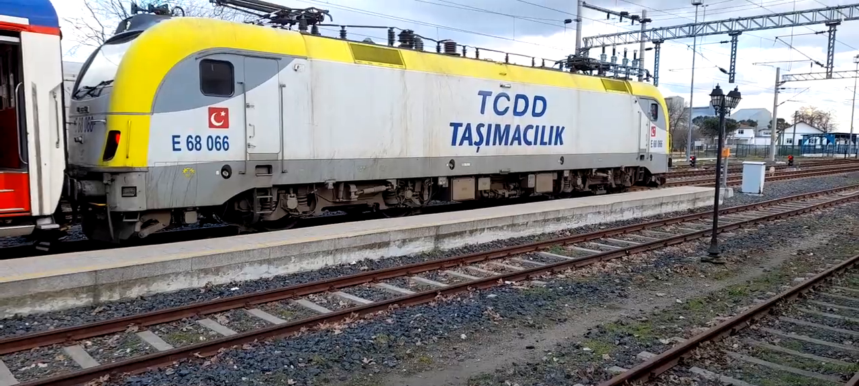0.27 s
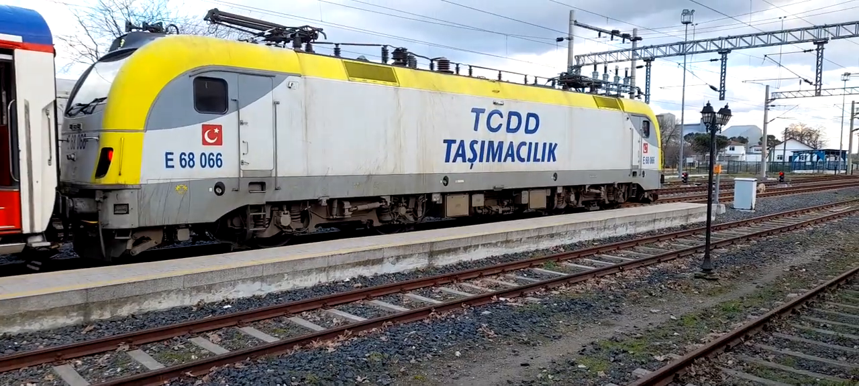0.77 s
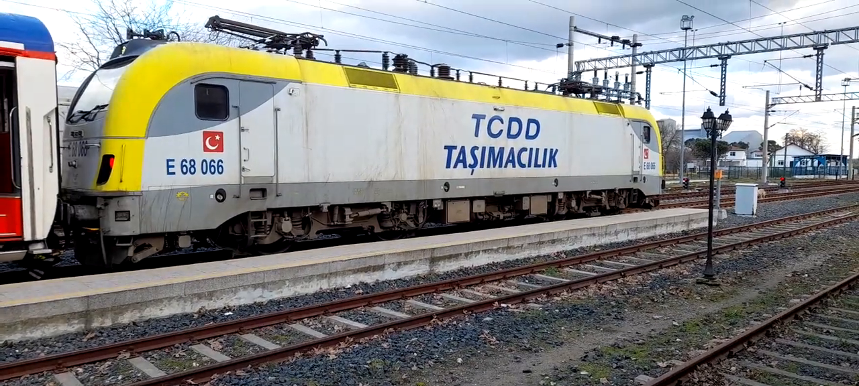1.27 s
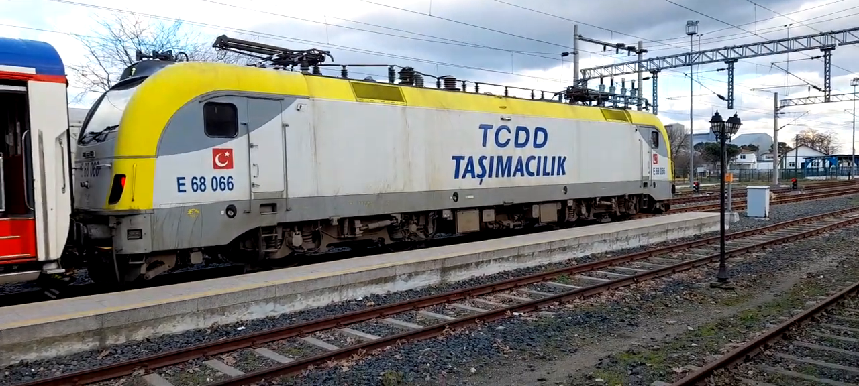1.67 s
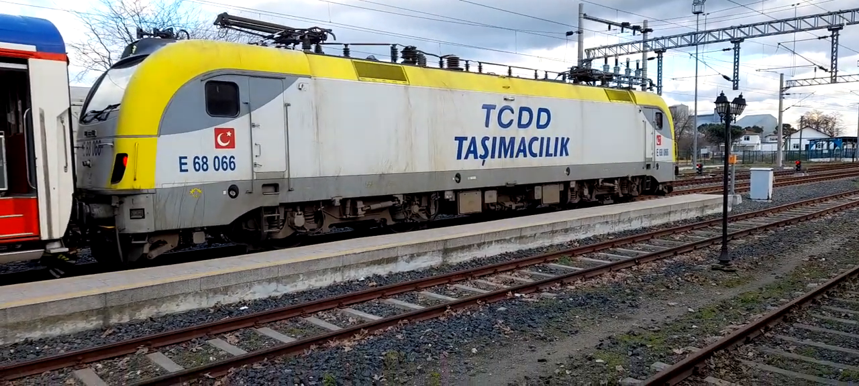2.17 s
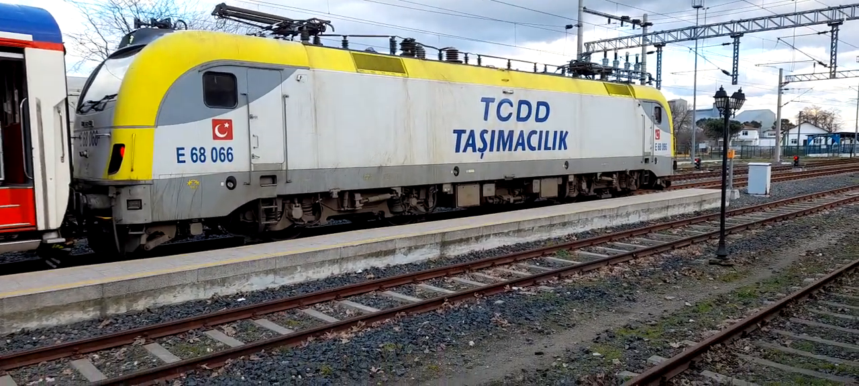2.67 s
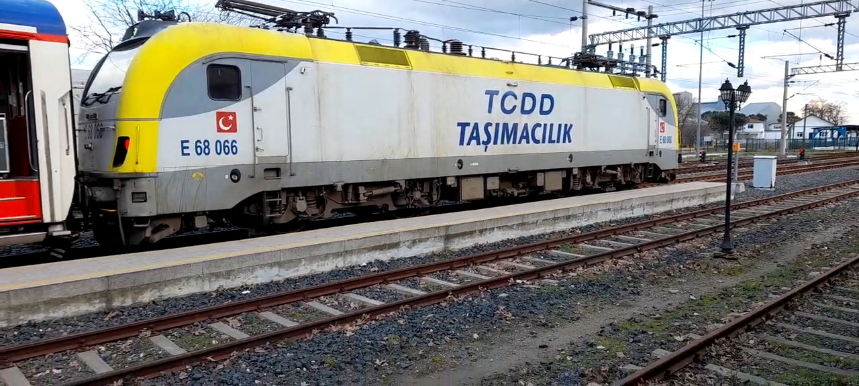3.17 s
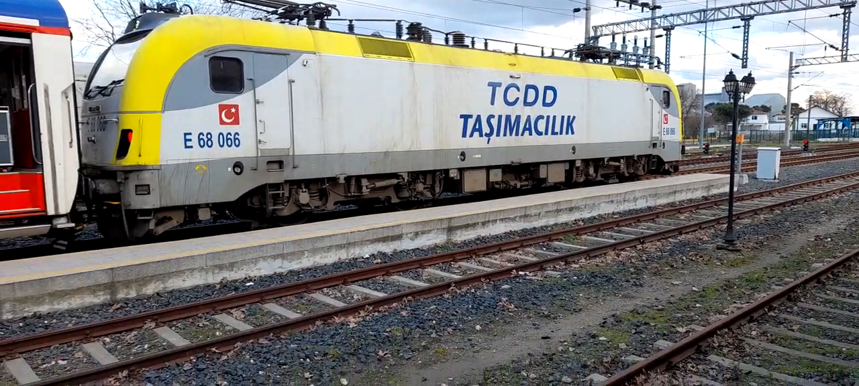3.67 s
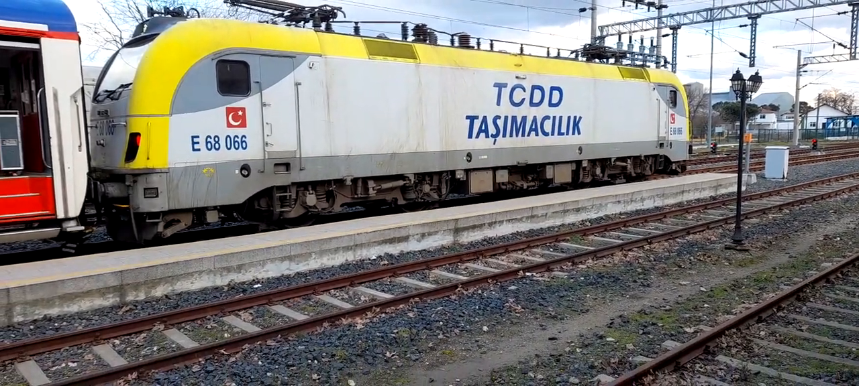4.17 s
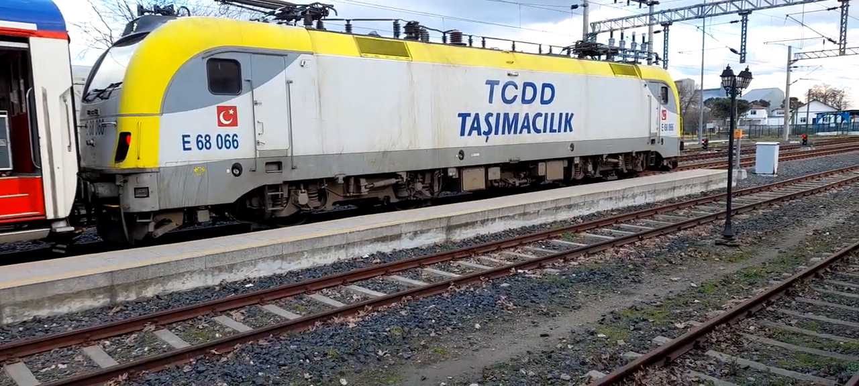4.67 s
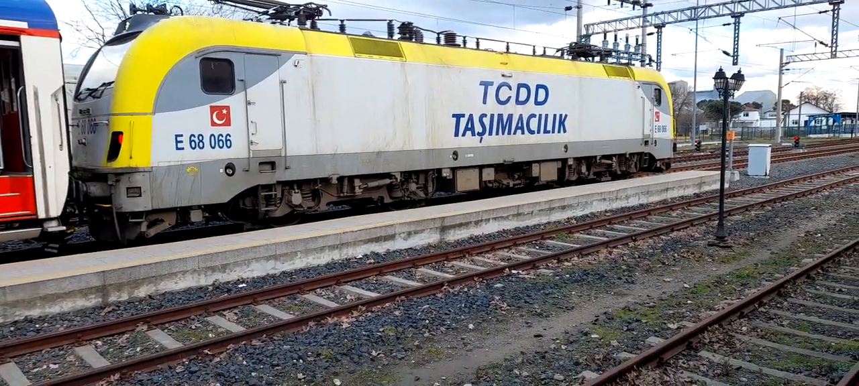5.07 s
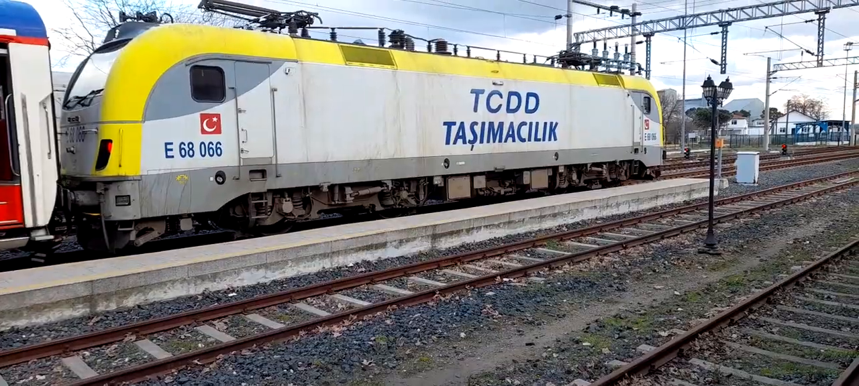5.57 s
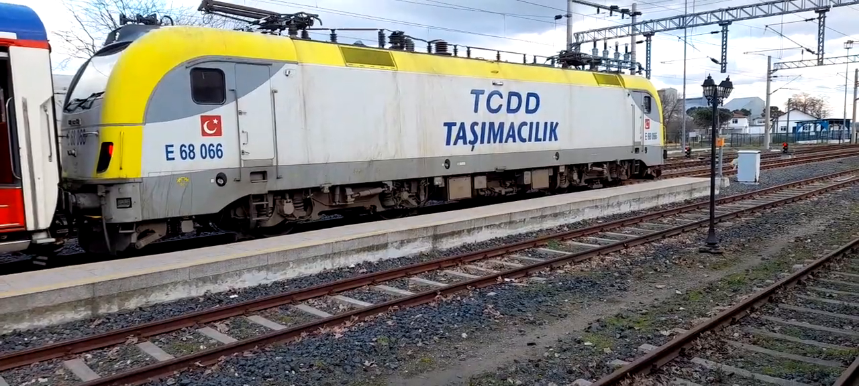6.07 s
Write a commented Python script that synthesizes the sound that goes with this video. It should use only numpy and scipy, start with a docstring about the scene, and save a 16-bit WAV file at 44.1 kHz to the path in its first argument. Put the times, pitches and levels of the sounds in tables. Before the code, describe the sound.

A locomotive vents a sudden loud hiss of compressed air for one second over a low hum, with light wind on the microphone.

```python
"""An open station yard, where an electric locomotive stands humming and jackdaws call far off.
A valve snaps open with a rising edge tone and vents compressed air for one second; the turbulent jet
stirs a hollow roar under the locomotive and reverberates between the trains. Later a thin hiss
swells, a light tap rings on metal, and a freshening wind buffets the microphone."""
import sys
import numpy as np
from scipy import signal
from scipy.fft import rfft, irfft
from scipy.io import wavfile
from scipy.ndimage import uniform_filter1d

SR = 44100
rng = np.random.default_rng(int(sys.argv[2]) if len(sys.argv) > 2 else 0)


def waveform_to_disk(signal):
    """Save audio, clipped to [-1, 1], as 16-bit WAV at the path in sys.argv[1]."""
    frames = np.transpose(np.atleast_2d(signal))
    scaled = np.clip(frames, -1, 1) * 32767
    samples = np.round(scaled).astype(np.int16)
    wavfile.write(sys.argv[1], SR, samples)


N = 278932
TIME = np.arange(N) / SR
FREQS = np.arange(N // 2 + 1) * SR / N
VALVE_OPENS_S, VALVE_SHUTS_S = 1.381, 2.4175

# Reverberation of the yard. Each row: frequency in Hz, time to decay by 60 dB in seconds.
YARD_DECAY = [(200, .9), (1000, 0.82), (3000, 0.77), (6500, 0.51), (10000, 0.37), (15000, 0.23)]
# The hum sinks after the blast and slowly returns. Each row: time in seconds, relative level in dB.
HUM_ENVELOPE = [(0, -60), (1.35, -56), (2.7, -67), (3.55, -68), (4.05, -61), (5.4, -55), (5.85, -58.5),
                (6.32, -60.5)]
# Spectrum of the hum's dull rush. Each row: frequency in Hz, relative level in dB.
HUM_SPECTRUM = [(40, -10.5), (110, 3), (200, -3), (300, 6.5), (420, 3), (700, 0), (1000, -2), (1400, -6),
                (2200, -6.5), (2600, -16.5), (3200, -23.5), (4500, -28.5), (6600, -31.5), (8000, -40)]
# Cooling fan resonances. Each row: centre in Hz, width in Hz, level in dB re the hum's envelope.
FAN_RESONANCES = [(318, 15, -3.5), (593.3, 70, -9.5), (950, 130, -10)]
# Spectrum of the faint ambient noise. Each row: frequency in Hz, relative level in dB.
AMBIENT_SPECTRUM = [(1000, -3), (2200, 4.5), (3200, -0.5), (4600, -2), (6700, 3), (8000, -12), (10500, -9),
                    (12500, -4.5), (15500, -7.5)]
# The breeze slackens, then freshens. Each row: time in seconds, strength in dB.
BREEZE_ENVELOPE = [(0, -46), (1.3, -46.5), (2.45, -47.5), (3.15, -52.5), (3.9, -41), (4.7, -39.5),
                   (5.5, -31.5), (6.32, -37.5)]
# Gusts on top of the breeze. Each row: time of the peak in seconds, length in seconds, strength in dB.
WIND_GUSTS = [(0.383, 0.13, -41), (1.117, 0.17, -39.5), (3.306, 0.043, -38), (3.832, .11, -35.5),
              (3.993, .08, -34.5), (4.482, 0.14, -35.5), (5.039, 0.098, -34.5), (5.36, .05, -30.5),
              (5.51, 0.029, -30), (5.674, 0.053, -19), (5.729, 0.025, -19.5), (5.897, 0.04, -28),
              (6.296, 0.052, -27.5)]
# Spectra of the steady flow and of gust eddies. Each row: frequency in Hz, relative level in dB.
FLOW_SPECTRUM = [(15, -27), (35, -13), (58, 2), (85, 1), (120, -1), (190, -19.5), (300, -29), (700, -50.5),
                 (1500, -73.5)]
EDDY_SPECTRUM = [(80, -12), (130, 6), (170, -3), (220, -4.5), (310, -5), (400, -21), (700, -32),
                 (2000, -64.5)]
# Jackdaw calls. Each row: start in seconds, length in seconds, first pitch in Hz, last pitch in Hz,
# relative level in dB, gain of the upper two harmonics in dB.
JACKDAW_CALLS = [(.09, .03, 926, 716, -49, -3), (.58, .028, 1255, 1110, -48.5, -12),
                 (.608, 0.037, 1273, 1160, -54.5, -10), (0.802, 0.054, 1470, 1140, -53, 2),
                 (0.841, .028, 1390, 1240, -51, -6), (.883, .047, 1430, 1080, -56, -4.5)]
# The first four harmonics of a call. Each entry: relative level in dB.
CALL_HARMONICS_DB = [-7.5, -3, -13, -21]
# Spectrum of the jet. Each row: frequency in Hz, left gain in dB, right gain in dB.
JET_SPECTRUM = [(200, -23.5, -20), (285.3, -18, -12), (440, -16, -14.5), (670, -18, -18), (950, -14, -11.5),
                (1450, -13.5, -12), (1620, -11, -4), (3000, -9, -8), (3600, -11, -9), (4262, -5, -9.5),
                (5400, -1.5, -9.5), (6740, 0.5, 2.5), (7770, -14.5, -9), (9500, -8.5, -9),
                (11500, -2, -9.5), (13000, 0, -4.5), (14200, -6, -7.5), (14900, -22, 2.5)]
# Spectrum of the thin hiss. Each row: frequency in Hz, relative level in dB.
HISS_SPECTRUM = [(1500, -5), (2200, 4.5), (2950, -1), (3600, 2), (4600, -5), (6700, 1), (7750, -9.5),
                 (9000, -4.5), (10000, -4.5), (10900, -8.5), (12100, -2.5), (12900, -2), (13450, 2),
                 (14000, -3.5), (15700, -9.5)]
# Modes of the tapped metal. Each row: frequency in Hz, relative level in dB, 60 dB decay in seconds.
METAL_MODES = [(1350, -53.5, .06), (1930, -48, .06), (2470, -56, 0.045), (4340, -47, 0.047),
               (6930, -57, 0.045)]


def undb(db):
    """Amplitude grows tenfold with every 20 dB."""
    return 10 ** (np.asarray(db) / 20)


def unit(x):
    """Normalisation to an rms of 1."""
    return x / np.sqrt(np.mean(x ** 2))


def since(s):
    """Elapsed seconds after a moment, zero before it."""
    return np.maximum(TIME - s, 0)


def ramp(s, length_s):
    """A raised-cosine onset from 0 to 1."""
    return np.sin(np.pi / 2 * np.minimum(since(s) / length_s, 1)) ** 2


def at_time(points):
    """Linear interpolation of (seconds, value) points over the scene."""
    return np.interp(TIME, *np.transpose(points))


def at_hz(hz, points):
    """Interpolation of (Hz, value) points on a logarithmic frequency axis."""
    f, value = np.transpose(points)
    return np.interp(np.log(hz + 1), np.log(f), value)


def colour(x, points):
    """Spectral shaping by a gain curve of (Hz, dB) points."""
    return irfft(rfft(x) * undb(at_hz(FREQS, points)), N)


def resonance(x, hz, width_hz, stages=2):
    """Forced response of damped resonators in series, each width_hz wide, scaled to rms 1."""
    response = 1 / (1 + 1j * (FREQS ** 2 - hz ** 2) / (width_hz * FREQS + 1e-9))
    return unit(irfft(rfft(x) * response ** stages, N))


def walk(rate_hz):
    """A random modulator: noise of rms 1, low-passed near rate_hz."""
    return unit(irfft(rfft(rng.standard_normal(N)) * np.exp(-(FREQS / rate_hz) ** 2), N))


def stereo_noise(direct_share, lead_s):
    """A direct wave, lead_s earlier on the left (negative: on the right), plus a diffuse field."""
    direct, mid, side = rfft(rng.standard_normal((3, N)))
    coherence = .8 / (1 + (FREQS / 480) ** 4)  # long waves reach both ports alike
    mid, side = mid * np.sqrt((1 + coherence) / 2), side * np.sqrt((1 - coherence) / 2)
    diffuse = np.array([mid + side, mid - side])
    direct = direct * np.exp(np.array([[1], [-1]]) * 1j * np.pi * FREQS * lead_s)
    return irfft(np.sqrt(direct_share) * direct + np.sqrt(1 - direct_share) * diffuse, N)


def echoes(x, response):
    """Convolution with a stereo impulse response scaled to unit energy."""
    response = response / np.sqrt(np.sum(response ** 2, axis=1, keepdims=True))
    return signal.fftconvolve(np.atleast_2d(x), response, axes=1)[:, :N]


def yard(x, build_s=.042):
    """Reverberation: trains and platforms scatter sound, and air absorption takes the treble first."""
    t, hz, tail = TIME[:SR], np.arange(SR // 2 + 1), 0
    edges_hz = np.geomspace(100, 18000, 13)
    for lo, hi in zip(edges_hz, edges_hz[1:]):
        band = irfft(rfft(rng.standard_normal((2, SR))) * ((hz >= lo) & (hz < hi)), SR)
        t60 = at_hz(np.sqrt(lo * hi), YARD_DECAY)
        tail = tail + band * np.exp(-np.log(1000) * t / t60)
    return echoes(x, tail * (1 - np.exp(-t / build_s)))


def underframe(x, scatter_db, t60=.1):
    """Early reflections from bogies and ballast join the direct sound."""
    t = TIME[:SR // 8]
    spray = rng.standard_normal((2, len(t))) * np.exp(-np.log(1000) * t / t60) * (t > .002)
    return (x + undb(scatter_db) * echoes(x, spray)) / np.hypot(1, undb(scatter_db))


def hum(rush_db=8.5, waver_db=1.08, direct_share=.17, lead_s=-.00047):
    """Broadband noise of fans and distant traffic, with a few broad resonances, from the right."""
    rush = unit(colour(stereo_noise(direct_share, lead_s), HUM_SPECTRUM)) * undb(rush_db)
    fans = sum(resonance(stereo_noise(direct_share, lead_s), hz, width_hz) * undb(db)
               for hz, width_hz, db in FAN_RESONANCES)
    return (rush * undb(waver_db * walk(27)) + fans) * undb(at_time(HUM_ENVELOPE))


def blower(hz=975, width_hz=190, level_db=-65.5):
    """Resonance narrows the noise of a blower on the train to a faint, steady whirr."""
    return resonance(stereo_noise(direct_share=.2, lead_s=-.00047), hz, width_hz) * undb(level_db)


def open_air(level_db=-68.5, follows_hum=.3, hum_reference_db=-62):
    """The ambient noise floor, uncorrelated between the sides, rises and sinks a little with the hum."""
    air = unit(colour(rng.standard_normal((2, N)), AMBIENT_SPECTRUM))
    return air * undb(level_db + follows_hum * (at_time(HUM_ENVELOPE) - hum_reference_db))


def wind_strength(flurry_db=1.8, flurry_hz=13):
    """Incoherent addition: the powers of a fluctuating breeze and its gusts sum to a strength in dB."""
    power = undb(at_time(BREEZE_ENVELOPE) + flurry_db * walk(flurry_hz)) ** 2
    for peak_s, length_s, db in WIND_GUSTS:
        power = power + undb(db) ** 2 * np.exp(-(2 * (TIME - peak_s) / length_s) ** 2)
    return 10 * np.log10(power)


def buffet(evenness=.6):
    """Turbulent pressure swings at one microphone port, evened out to much the same size."""
    pressure = colour(rng.standard_normal(N), FLOW_SPECTRUM)
    power = uniform_filter1d(pressure ** 2, SR // 16) + 1e-12
    return unit(pressure / power ** (evenness / 2))


def wind(reference_db=-24, flow_db=-1, eddy_db=-5, flow_growth=.89, eddy_growth=1.5):
    """Eddy shedding at the microphone: as a gust grows, fast eddies gain on the slow flow."""
    excess_db = wind_strength() - reference_db
    flow = np.array([buffet(), buffet()]) * undb(flow_db + flow_growth * excess_db)
    eddies = unit(colour(rng.standard_normal((2, N)), EDDY_SPECTRUM) * undb(3 * walk(35)))
    eddies = eddies * undb(eddy_db + eddy_growth * excess_db)
    left_over_right_db = -5 + 4 * walk(12)  # the wind veers, favouring the right
    pan = undb(np.array([[1], [-1]]) * left_over_right_db / 2)
    return undb(reference_db) * (flow + eddies) * pan / np.sqrt(np.mean(pan ** 2, axis=0))


def jackdaws(rasp=.045, rough_db=3, yard_db=-8, gain_db=-2):
    """Harmonic calls that fall in pitch; random frequency and amplitude modulation make them hoarse."""
    calls, jitter = np.zeros(N), 1 + rasp * walk(500)
    for start_s, length_s, first_hz, last_hz, db, bright_db in JACKDAW_CALLS:
        on = (TIME > start_s) & (TIME < start_s + length_s)
        progress = (TIME[on] - start_s) / length_s
        hz = first_hz + (last_hz - first_hz) * progress ** 2
        phase = 2 * np.pi * np.cumsum(hz * jitter[on]) / SR
        harmonics = [gain * np.sin(k * phase) for k, gain in enumerate(undb(CALL_HARMONICS_DB), 1)]
        brightness = undb(bright_db) * (1 - progress ** 2)  # upper harmonics fade as the pitch drops
        voice = sum(harmonics[:2]) + brightness * sum(harmonics[2:])
        calls[on] += undb(db) * voice * np.sqrt(2 * np.sin(np.pi * progress))
    calls = calls * undb(rough_db * walk(300))
    return undb(gain_db) * (calls + undb(yard_db) * yard(calls))


def airflow(full_db=-12.5, seep_s=.018, seep_db=-30, lift_s=.04, empty_db_per_s=269):
    """Flow sets the jet's amplitude: a seep, a quick lift, a hold, then decay as the pipe empties."""
    seep = undb(seep_db) * ramp(VALVE_OPENS_S - seep_s, seep_s)
    opening = ramp(VALVE_OPENS_S, lift_s) + seep
    return opening * undb(full_db - empty_db_per_s * since(VALVE_SHUTS_S))


def jet(flutter_db=-.1, surge_db=.68, shift_db=.96):
    """Turbulent mixing noise from the valve; each band wavers as eddies of its size come and go."""
    spectrum = rfft(stereo_noise(direct_share=.38, lead_s=.00029))
    edges_hz = [0, 1500, 3200, 5300, 8000, 12000, SR]
    bands = [irfft(spectrum * ((FREQS >= lo) & (FREQS < hi)), N)
             for lo, hi in zip(edges_hz, edges_hz[1:])]
    turbulence = sum(band * undb(shift_db * walk(13)) for band in bands)
    turbulence = turbulence * undb(flutter_db * walk(30) + surge_db * walk(12))
    sides = underframe(turbulence, scatter_db=-6, t60=.11)
    hz, *side_db = np.transpose(JET_SPECTRUM)
    air = np.array([colour(side, np.c_[hz, db]) for side, db in zip(sides, side_db)])
    air = colour(air, [(60, -12.5), (200, -4.5)])  # thinner bass
    return unit(air) * airflow()


def cavity(hz=308, width_hz=75, gain_db=-29, right_over_left_db=6, build_s=.88, yard_db=-7):
    """Cavity resonance: the jet drives a hollow roar that builds in the space under the locomotive."""
    build = 1 - np.exp(-since(VALVE_OPENS_S) / build_s)
    roar = resonance(rng.standard_normal(N), hz, width_hz) * build * airflow() * undb(gain_db)
    pan = undb(np.array([[-1], [1]]) * right_over_left_db / 2)
    return (roar + undb(yard_db) * yard(roar)) * pan


def squeak(first_hz=5510, last_hz=11800, climb_s=.056, bend=1.65, wobble=.035, rough_db=3.5,
           peak_db=-11.5, lag_s=.003, attack_s=.013, fade_db_per_s=235.5):
    """An unsteady edge tone at the valve seat climbs as the valve lifts, frays and fades under the jet."""
    start_s = VALVE_OPENS_S + lag_s
    hz = first_hz + (last_hz - first_hz) * np.minimum(since(start_s) / climb_s, 1) ** bend
    rise = hz / first_hz - 1
    jitter = 1 + wobble * (.5 + 2 * rise) * walk(1400)
    phase = 2 * np.pi * np.cumsum(hz * jitter) / SR
    tone = unit(np.sin(phase) * undb(rough_db * np.tanh(walk(400))))
    envelope = ramp(start_s, attack_s) * undb(peak_db - fade_db_per_s * since(start_s + attack_s))
    return underframe(tone * envelope, scatter_db=-1, t60=.16)


def hiss(start_s=3.594, rise_s=.38, level_db=-55, sag_db_per_s=.38, whirr_db=-13,
         direct_share=.25, lead_s=-.00052):
    """Treble noise with a faint resonant whirr swells on the right, then slowly sags."""
    air = underframe(stereo_noise(direct_share, lead_s), scatter_db=-4.5, t60=.04)
    air = colour(air, HISS_SPECTRUM)
    air = colour(air, [(500, -22.5), (1500, 1)])  # bass cut
    whirr = resonance(stereo_noise(direct_share, lead_s), hz=2170, width_hz=220, stages=1)
    swell = 1 - np.exp(-since(start_s) / rise_s)
    envelope = swell * undb(level_db - sag_db_per_s * since(start_s))
    return (unit(air) + undb(whirr_db) * whirr) * envelope


def clink(start_s=5.318, attack_s=.006, rattle_db=4, yard_db=-8):
    """Modal ringing: a light, rattling tap on the train's metal excites damped sinusoids."""
    t = since(start_s)
    ring = sum(undb(db) * np.sin(2 * np.pi * hz * t) * np.exp(-np.log(1000) * t / t60)
               for hz, db, t60 in METAL_MODES)
    ring = ring * ramp(start_s, attack_s) * undb(rattle_db * np.tanh(walk(350)))
    return underframe(ring, scatter_db=-3.5) + undb(yard_db) * yard(ring)


def scene(yard_db=-17):
    """Superposition of the air blast, its reverberation and the quieter sounds of the yard."""
    blast = jet() + squeak()
    venting = blast + undb(yard_db) * yard(blast) + cavity()
    return venting + hum() + blower() + open_air() + hiss() + wind() + jackdaws() + clink()


def record(dry, low_cut_hz=36, top_hz=15680):
    """Band limiting: a high-pass thins the deepest bass and a steep low-pass cuts the top."""
    highpass = signal.butter(2, low_cut_hz, "highpass", fs=SR, output="sos")
    lowpass = signal.ellip(12, .1, 80, top_hz, fs=SR, output="sos")
    return signal.sosfilt(lowpass, signal.sosfilt(highpass, dry))


dry = scene()
out = record(dry)
waveform_to_disk(out)
```